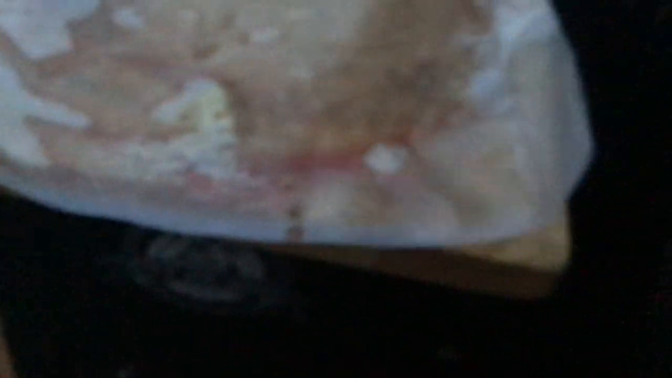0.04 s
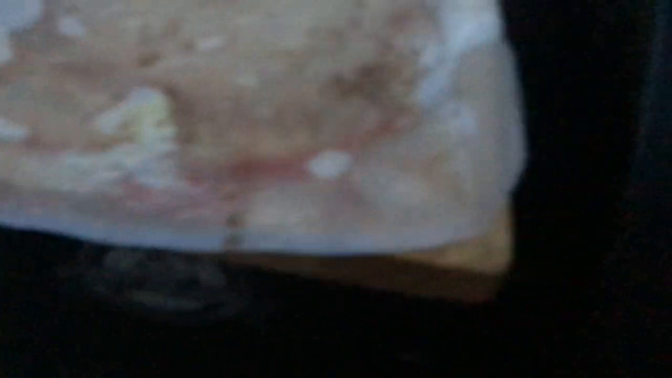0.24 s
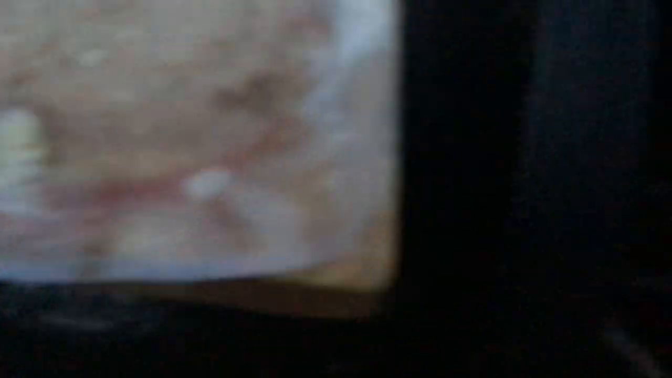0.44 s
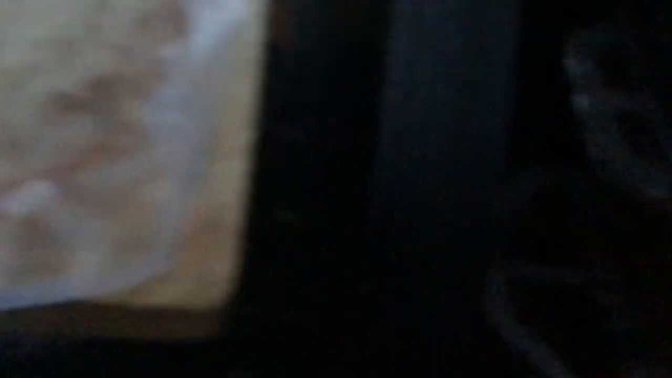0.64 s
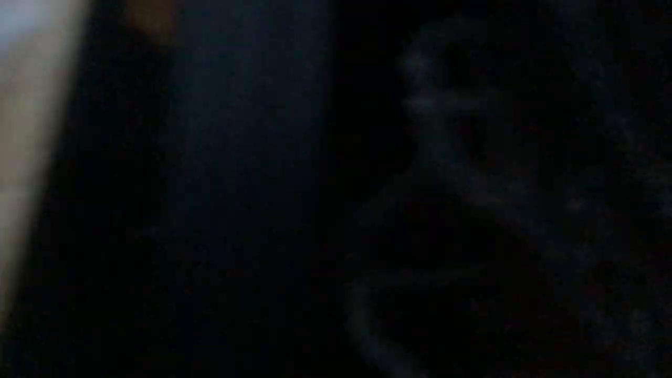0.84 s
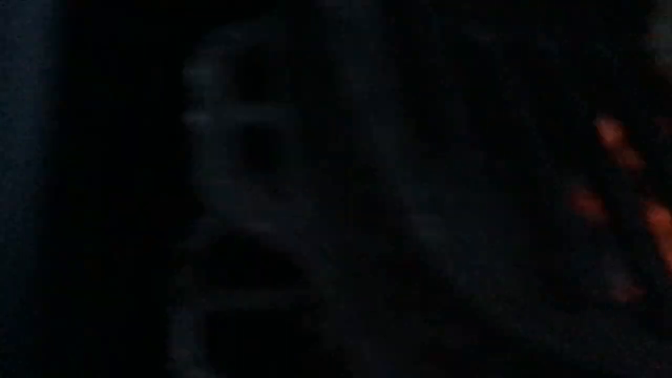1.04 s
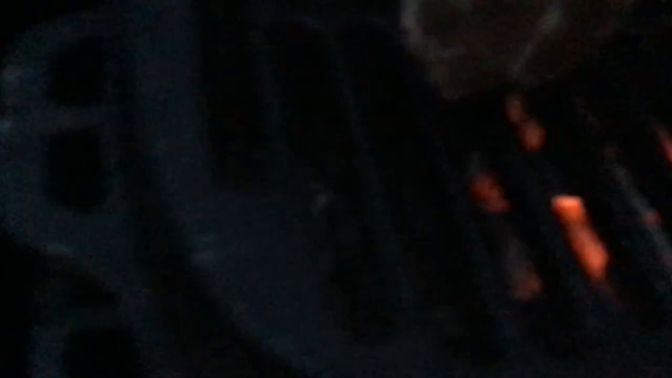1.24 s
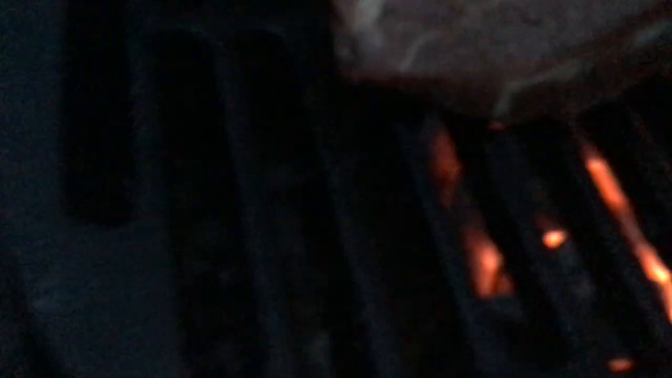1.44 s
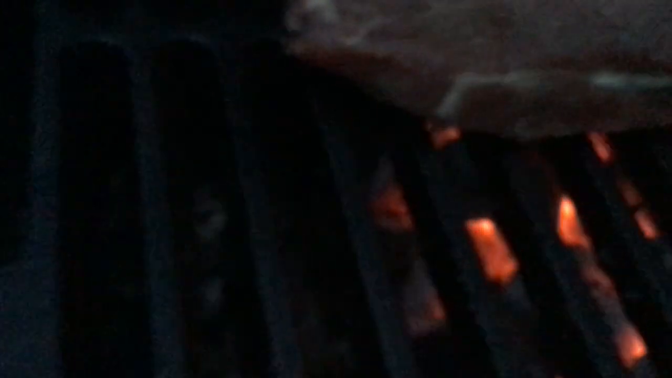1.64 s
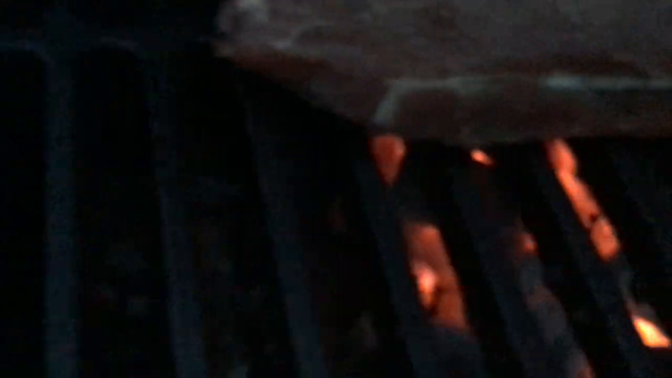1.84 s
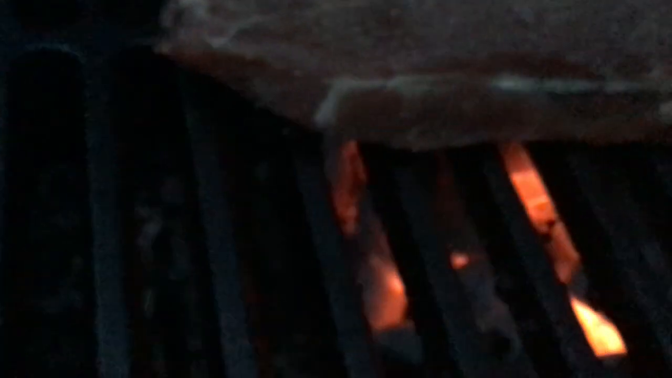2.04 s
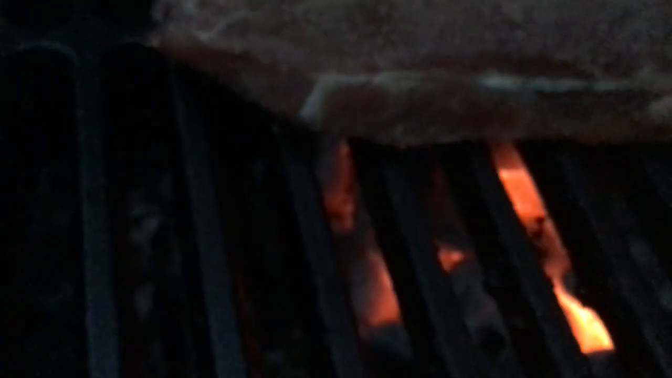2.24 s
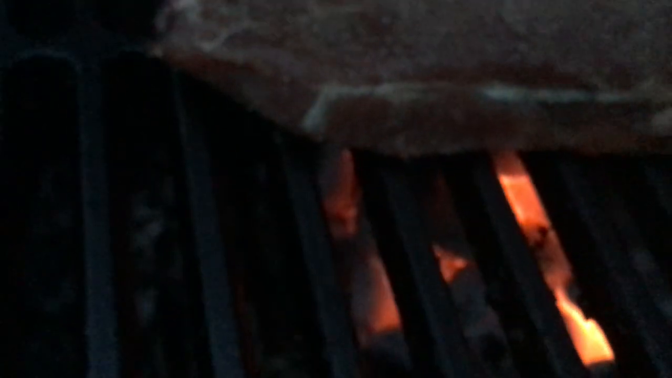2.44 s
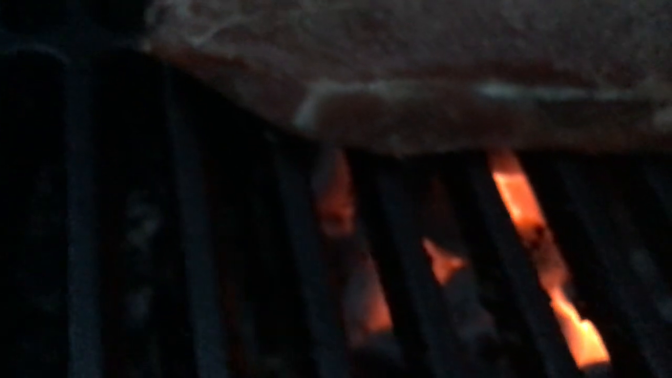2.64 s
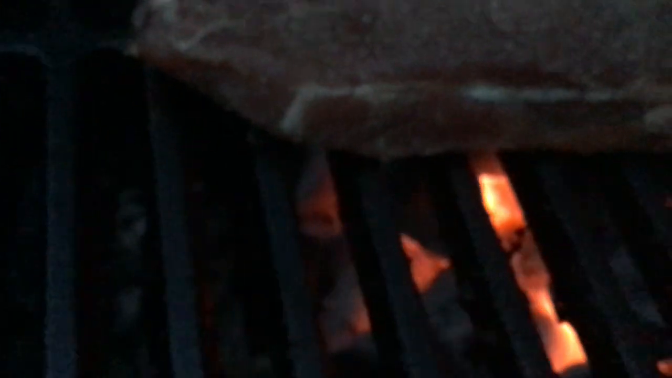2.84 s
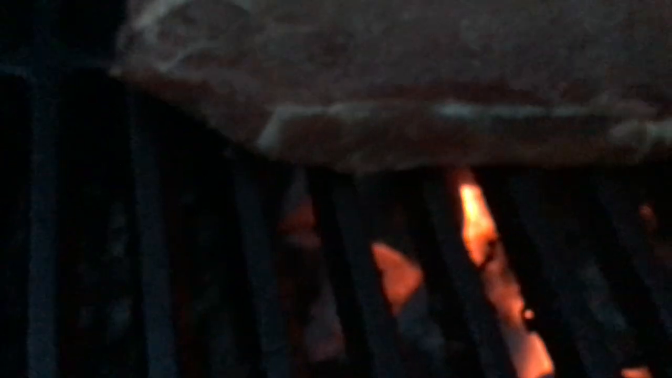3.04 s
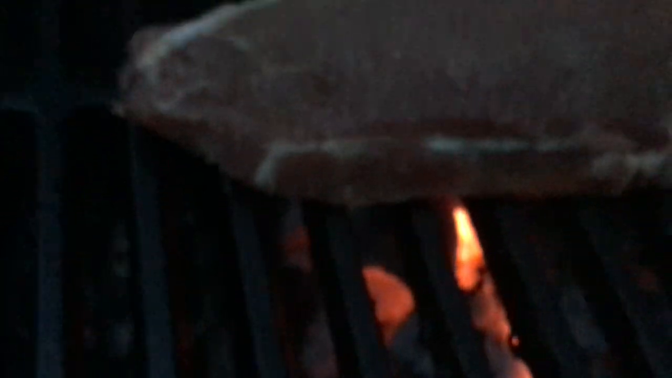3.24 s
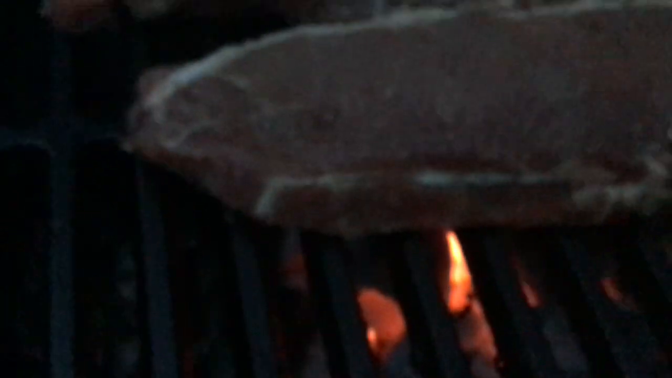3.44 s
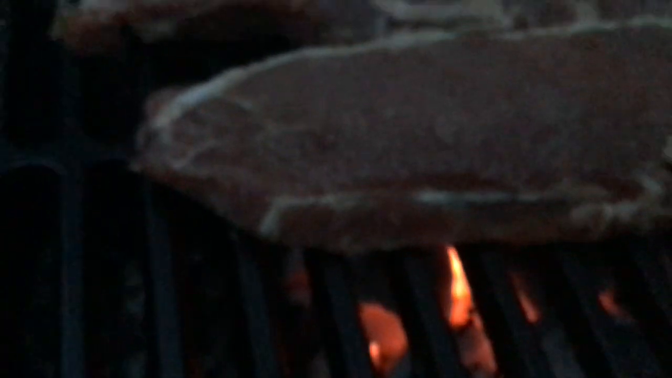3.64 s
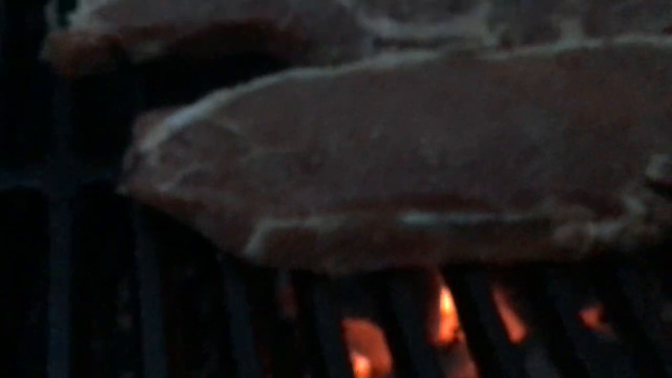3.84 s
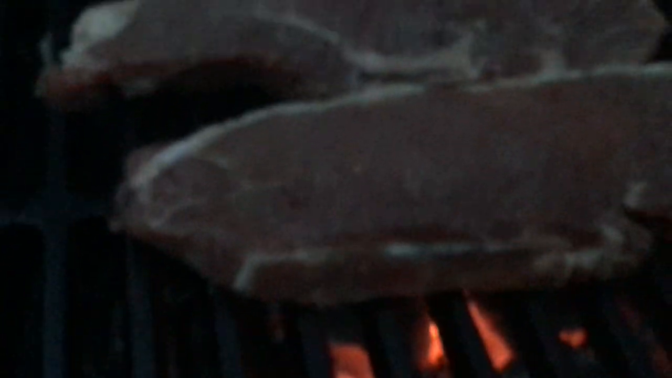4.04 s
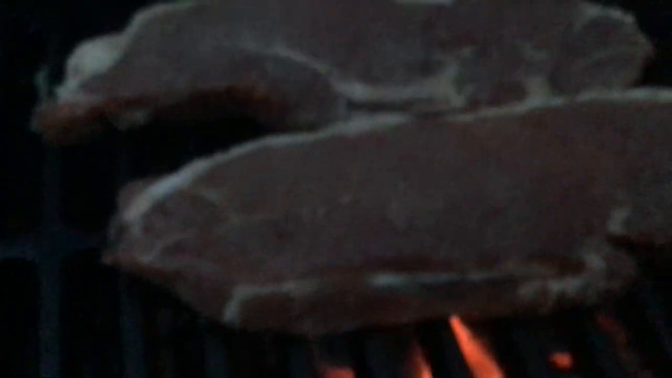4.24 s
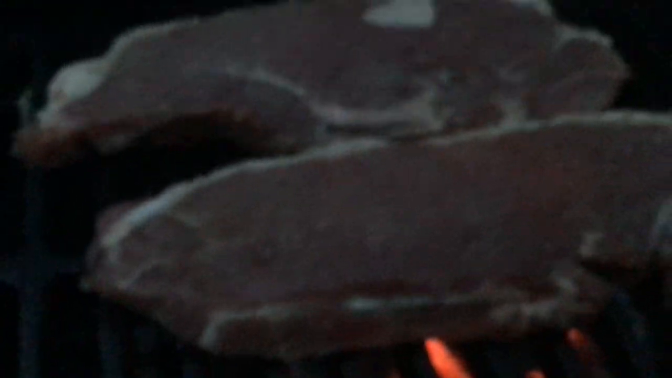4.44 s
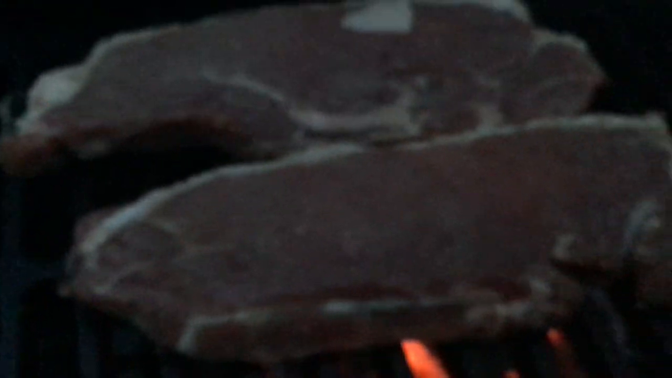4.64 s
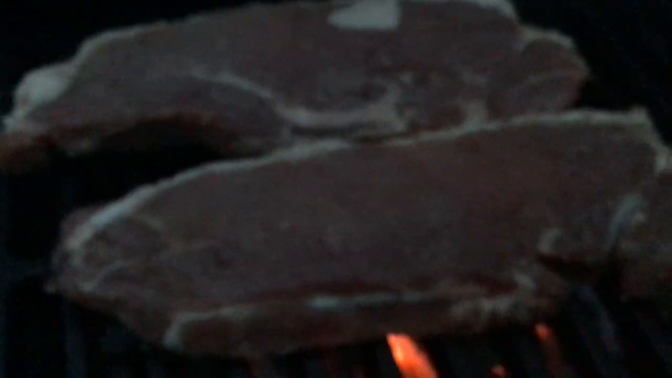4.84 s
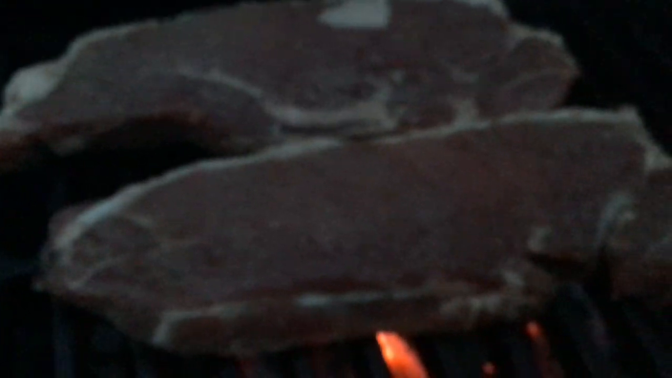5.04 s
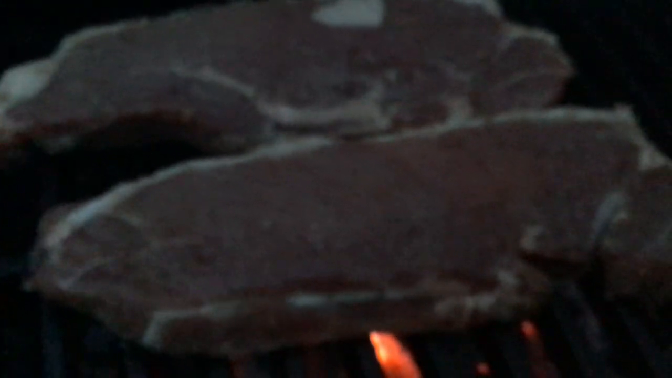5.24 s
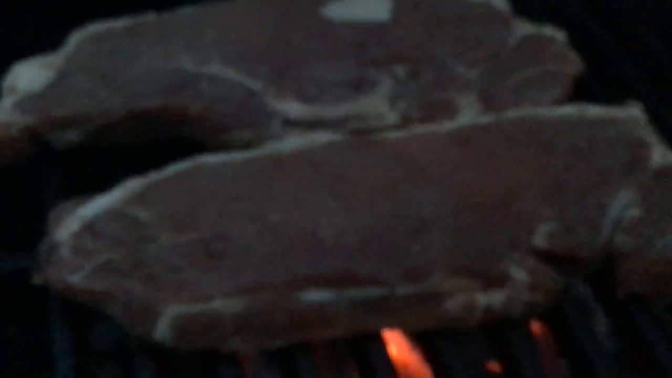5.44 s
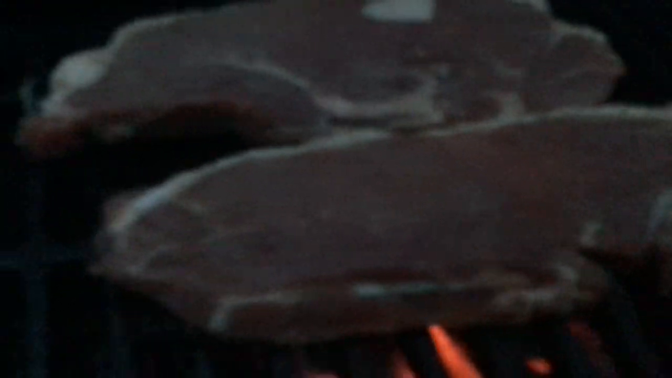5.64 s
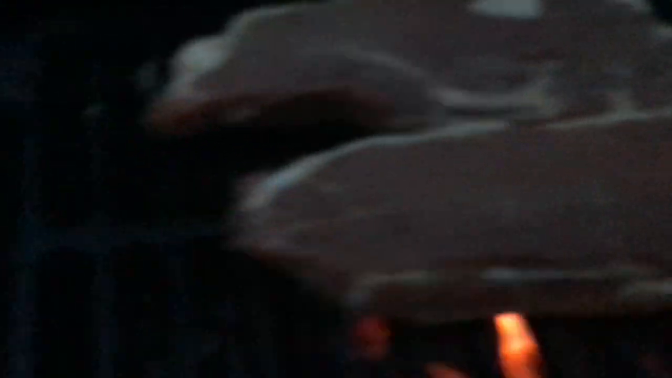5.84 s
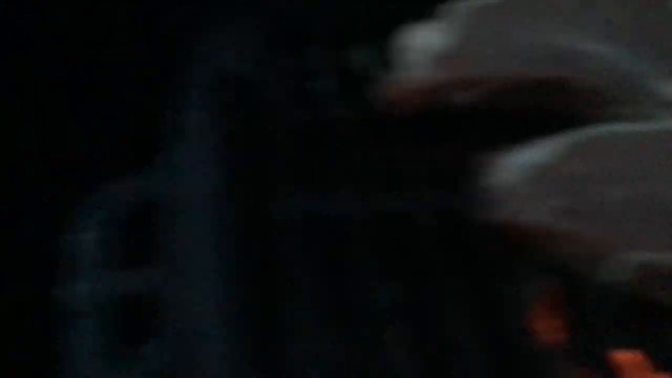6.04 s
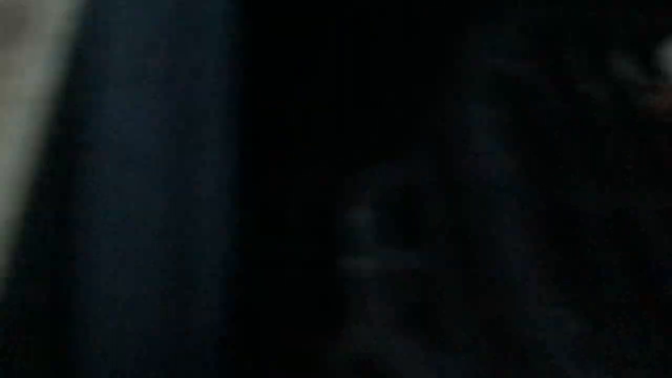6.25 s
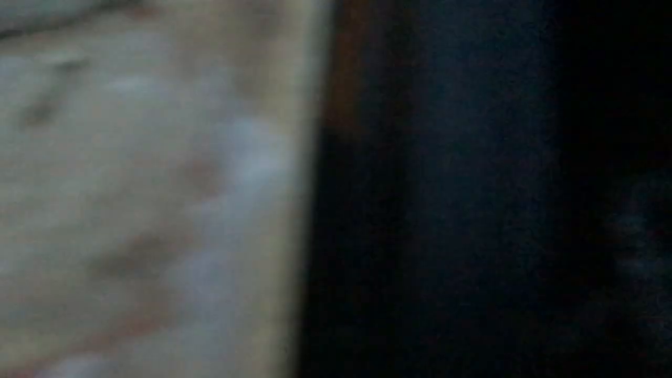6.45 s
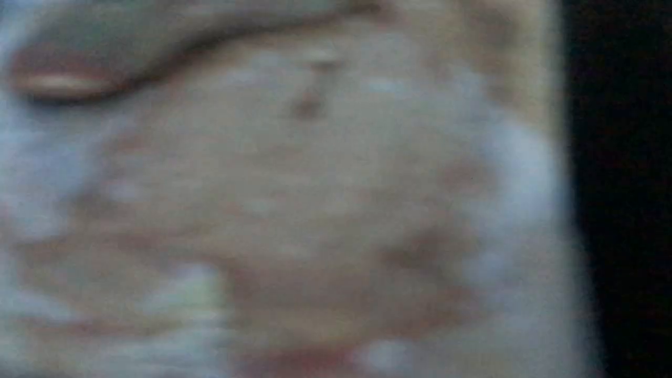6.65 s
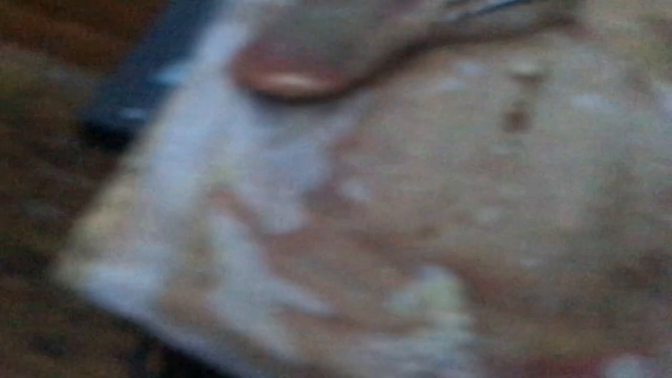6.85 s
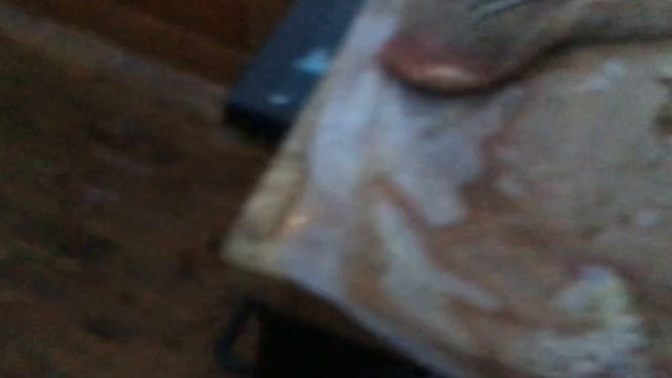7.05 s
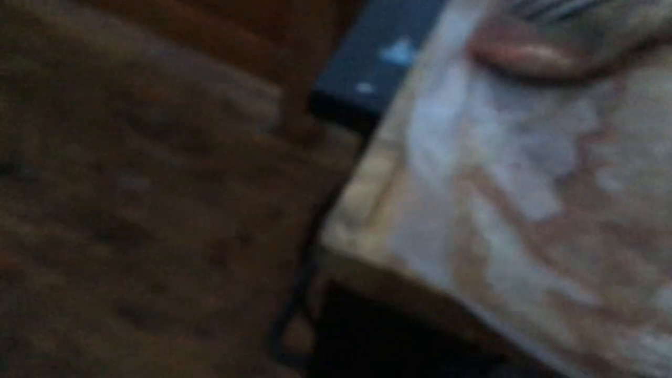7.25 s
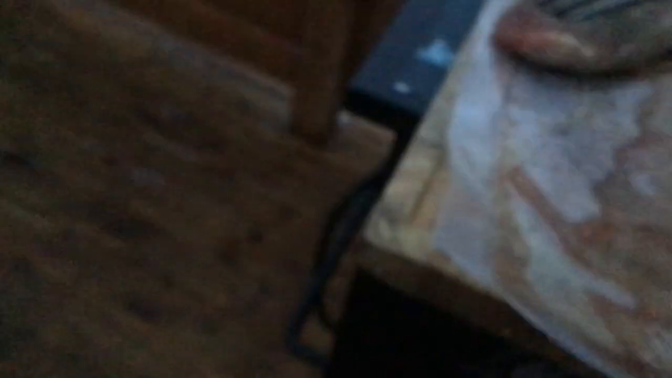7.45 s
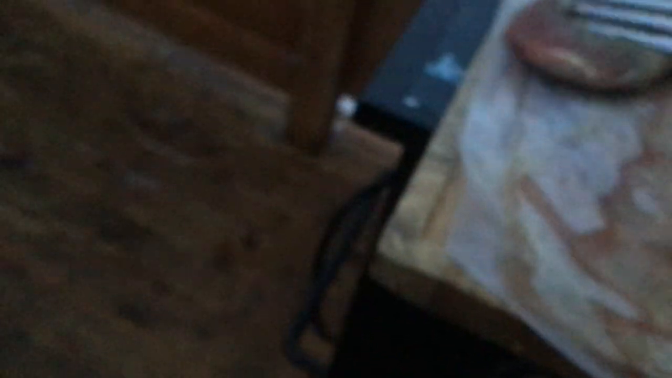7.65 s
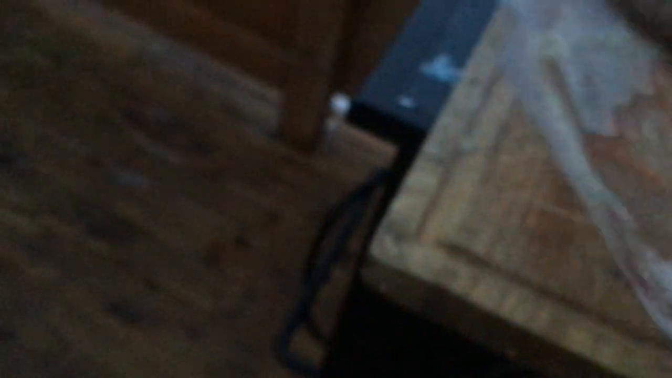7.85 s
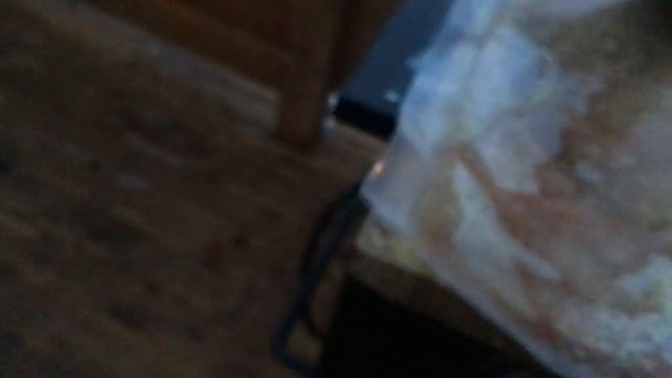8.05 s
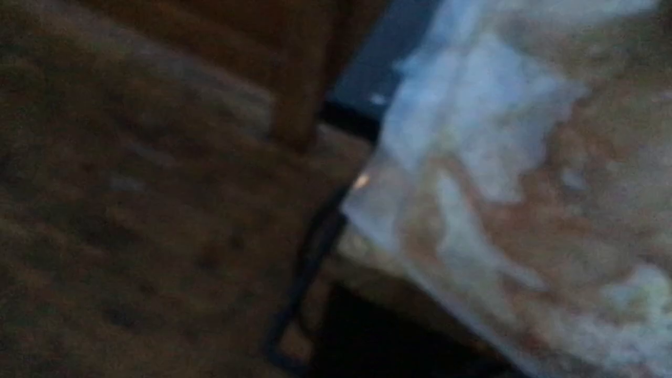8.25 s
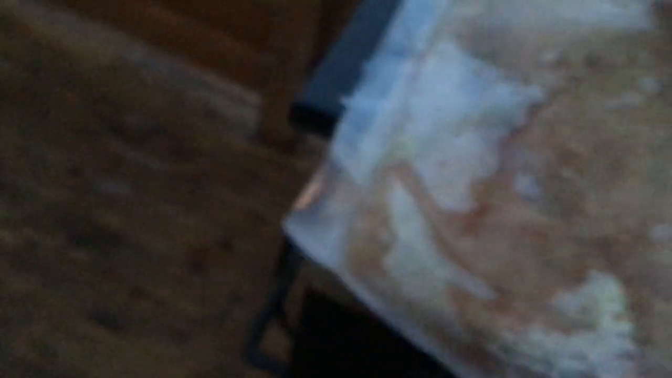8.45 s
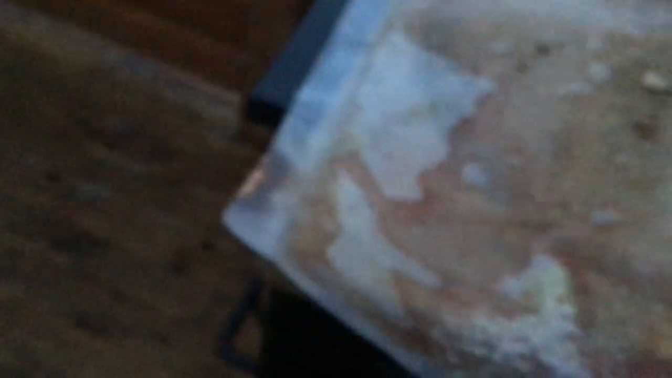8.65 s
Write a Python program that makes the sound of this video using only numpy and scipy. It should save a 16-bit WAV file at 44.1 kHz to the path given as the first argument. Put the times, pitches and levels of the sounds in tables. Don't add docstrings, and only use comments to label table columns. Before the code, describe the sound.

Outdoors beside a small charcoal grill, meat hisses softly over low distant traffic and a faint humming fan. The handheld microphone moves close above and the sizzle swells, bright and dense, with a few sharp fat cracks up to about four seconds. Dull handling bumps follow; the hiss recedes as the microphone turns away, and wrapping film snaps crisply at the end.

```python
import sys
import numpy as np
from scipy import signal
from scipy.fft import rfft, irfft, next_fast_len
from scipy.io import wavfile
from scipy.ndimage import uniform_filter1d

SR = 44100
rng = np.random.default_rng(int(sys.argv[2]) if len(sys.argv) > 2 else 0)


def decibels_to_gain(level_db):
    exponent = np.asarray(level_db, float) / 20
    return 10 ** exponent


def unload_wav(signal):
    wavfile.write(
        sys.argv[1],
        SR,
        np.round(np.clip(np.atleast_2d(signal).T, -1, 1) * 32767).astype(np.int16),
    )


N = 384111
EDGE_HZ = 15730


def evened(x):
    return x / np.sqrt(np.mean(x ** 2) + 1e-20)


def read(points, hz):
    f, value = np.transpose(points)
    return np.interp(np.log(hz + 1), np.log(f + 1), value)


def bump(hz, centre_hz, width_hz):
    return 1 / (1 + (2 * (hz - centre_hz) / width_hz) ** 2)


def add(mix, start_s, sound):
    part = mix[round(start_s * SR):][:len(sound)]
    part += sound[:len(part)]


def causal(gain_db):
    cepstrum = irfft(np.log(decibels_to_gain(np.maximum(gain_db, -100))))
    half = len(cepstrum) // 2
    cepstrum[1:half] *= 2
    cepstrum[half + 1:] = 0
    return irfft(np.exp(rfft(cepstrum)))


def drift(shape, bins, frames):
    field = uniform_filter1d(rng.standard_normal(shape[::-1]).T, max(round(bins), 1), 0)
    return evened(uniform_filter1d(field, max(round(frames), 1), 1))


def bursts(per_s, spread_db):
    when, size, sign = rng.random(N), rng.exponential(1, N), rng.choice([-1., 1.], N)
    return evened((when < per_s / SR) * sign * decibels_to_gain(spread_db * np.minimum(size, 4)))


def ringing_snap(hz, cycles, peak_db):
    t = np.arange(2400) / SR
    grit = rng.standard_normal(2400)
    turns = t * hz / cycles
    ring = np.sin(2 * np.pi * hz * t + .15 * grit) * turns * np.exp(-2.5 * turns)
    return decibels_to_gain(peak_db) * ring / abs(ring).max()


def yard():
    # hz, density_db
    traffic = [(35, -33), (60, 5), (119, -2.5), (146, -5.5), (186, -2), (569, -8), (617, -12), (678, -8),
               (949, -13.5), (1500, -20.5), (1950, -41), (3300, -120)]
    # hz, width_hz, level_db
    fan_tones = [
        (119.6, 14, -76),
        (187, 63, -77),
    ]
    # time_s, pitch_hz, level_db
    whine = [(0, 618, -80), (.7, 636, -78), (1.3, 602, -74.5), (2.2, 610, -80.5), (3.4, 612, -75.5),
             (4.3, 610, -73), (6.3, 605, -80.5), (7.0, 604, -74.5), (8.71, 610, -79.5)]
    traffic_db, swell_depth_db, waver_depth_db = -66, -1.5, 1.8
    hum_hz, hum_db, whine_clean_db = 118, -77.5, -2

    hz, t, z = signal.stft(rng.standard_normal(N), SR, nperseg=4096)
    wash = decibels_to_gain(read(traffic, np.maximum(hz, 65)))
    wash *= decibels_to_gain(traffic_db) / np.sqrt(np.mean(wash ** 2))
    time_s, *tracks = np.transpose(whine)
    whine_hz, whine_db = (np.interp(t, time_s, track) for track in tracks)
    waver_db, swell_db = drift((2, len(t)), bins=1, frames=12) * [[waver_depth_db], [swell_depth_db]]
    whine_db = whine_db + waver_db
    flutter_db = 0.96 * drift(z.shape, bins=8, frames=4)
    wash = wash[:, None] * decibels_to_gain(flutter_db + swell_db * bump(hz[:, None], 60, 380))

    for tone_hz, width_hz, db in fan_tones + [(whine_hz, 18, whine_db - 5.5)]:
        wander_hz = tone_hz * (1 + 0.0032 * drift((1, len(t)), bins=1, frames=15))
        line = bump(hz[:, None], wander_hz, width_hz)
        line = line * decibels_to_gain(0.69 * drift((1, len(t)), bins=1, frames=4))
        wash = np.hypot(wash, decibels_to_gain(db) * line * np.sqrt(2 * SR / (np.pi * width_hz)))
    fuzzy = signal.istft(z * wash, SR, nperseg=4096)[1][:N]

    now = np.arange(N) / SR
    jitter_hz = 12 * drift((1, N), bins=1, frames=1500)[0]
    whine_turns = np.cumsum(np.interp(now, t, whine_hz) + jitter_hz) / SR
    whine_gain = decibels_to_gain(np.interp(now, t, whine_db) + whine_clean_db)
    clean_whine = whine_gain * np.sqrt(2) * np.sin(2 * np.pi * whine_turns)
    hum_turns = np.cumsum(hum_hz + 0.301 * jitter_hz) / SR
    hum = decibels_to_gain(hum_db) * np.sqrt(2) * np.sin(2 * np.pi * hum_turns)
    return fuzzy + clean_whine + hum


def board_creak():
    out = np.zeros(N)
    add(out, 1.5, ringing_snap(hz=2320, cycles=38, peak_db=-60.5))
    return out


def film():
    # start_s, length_s, crackle_db
    rustles = [
        (7.66, 0.19, -68),
        (7.85, 0.12, -61),
        (7.936, 0.11, -57),
        (8.06, 0.52, -66),
    ]
    # start_s, peak_db, pitch_hz
    snaps = [(7.69, -50, 3200), (7.724, -54, 1750), (7.76, -49, 2800), (7.795, -58, 1750),
             (7.858, -52, 1600), (7.859, -48, 3020), (7.875, -32, 11400), (7.885, -38, 10500),
             (7.899, -38, 12000), (7.94, -55, 4006), (7.943, -43, 9490), (7.967, -42, 12500),
             (7.994, -40, 10200), (7.995, -49, 2700), (8.004, -49, 3100), (8.015, -46, 3000),
             (8.027, -43, 3320), (8.07, -46, 12000), (8.13, -48, 11000), (8.257, -41, 8290),
             (8.291, -40, 5500), (8.382, -36, 5270), (8.396, -37, 8040), (8.484, -45, 4810),
             (8.5605, -52, 1850), (8.3, -54, 2800), (8.5607, -37, 6300), (8.61, -40, 9390)]
    t = np.arange(N) / SR
    pull = np.zeros(N)
    for start_s, length_s, db in rustles:
        phase = np.clip((t - start_s) / length_s, 0, 1)
        pull += decibels_to_gain(db) * abs(np.sin(np.pi * phase))
    crackle = pull * bursts(per_s=560, spread_db=4)
    out = signal.lfilter(*signal.butter(2, [1500, 15000], "band", fs=SR), crackle)
    for start_s, peak_db, hz in snaps:
        cycles = 1.6 * (1 + (1500 / hz) ** 2)
        add(out, start_s, ringing_snap(hz, cycles, peak_db))
    return out


def knocks():
    # start_s, peak_db, felt_below_hz, felt_above_hz, softness
    blows = [(3.8722, -42, 80, 30, 3), (3.9597, -55, 150, 40, 2.9), (1.897, -59, 400, 150, 3.8),
             (5.811, -49.5, 328, 198, 5.4), (5.857, -59, 260, 170, 8.8), (6.2093, -46, 90, 48, 3.3),
             (7.823, -58.5, 430, 340, 8), (7.854, -56, 700, 450, 6), (7.885, -63, 250, 130, 6.3),
             (7.944, -64, 300, 170, 6.5), (8.015, -57, 350, 150, 4.6), (8.559, -61, 680, 540, 9.8)]
    out, hz = np.zeros(N), np.fft.rfftfreq(8192, 1 / SR) + 1
    for start_s, peak_db, top_hz, low_hz, softness in blows:
        top_loss_db = 10 * np.log10(1 + (hz / top_hz) ** softness)
        low_loss_db = 10 * np.log10(1 + (low_hz / hz) ** 8)
        push = causal(-top_loss_db - low_loss_db)[:4000]
        add(out, start_s, decibels_to_gain(peak_db + 5) * push / abs(push).max())
    return out


def pops():
    # start_s, peak_db, tail_db, tail_t60_s
    cracks = [
        (0.7964, -35, -22, 0.02),
        (1.667, -26.5, -20, 0.02),
        (1.8967, -11.5, -20, 0.024),
        (2.5813, -19, -16, 0.022),
        (2.8266, -19.5, -8, 0.02),
        (3.9599, -8, -19, 0.018),
    ]
    # hz, density_db
    crack_colour = [(300, -24), (1100, -27.5), (2500, -12), (4300, -17), (5200, -10.5), (6800, -6.5),
                    (8300, -7.5), (9800, -2.5), (12200, -7), (15000, -7), (16000, -10), (16900, -54)]
    crack = causal(read(crack_colour, np.fft.rfftfreq(1024, 1 / SR)))[:400]
    out, t = np.zeros(N), np.arange(1500) / SR
    for start_s, peak_db, tail_db, t60_s in cracks:
        taps = rng.standard_normal(1500) * (t > .0004) * decibels_to_gain(tail_db - 60 * t / t60_s)
        taps[0] = 1
        pop = np.convolve(taps, crack)
        add(out, start_s + .0009, decibels_to_gain(peak_db) * pop / abs(pop).max())
    return out


def sizzle():
    # time_s, level_db
    nearness = [(0, -54.5), (.5, -53), (1.0, -49.5), (1.72, -49.5), (1.82, -42.5), (2.0, -39),
                (2.62, -39.5), (2.72, -36), (3.3, -36.5), (3.6, -39), (3.92, -40), (4.2, -42.5), (5.4, -45),
                (6.1, -45), (6.6, -48), (7.05, -55), (7.8, -57), (8.71, -55.5)]
    # hz, density_db
    hiss = [
        [(1600, -20.5), (2600, -12.5), (3700, -4.5), (4600, -1), (5200, -0.5), (6500, -2.5), (7300, -6),
         (8300, -2), (9300, 3), (11000, -0.5), (12000, -6), (15000, -8)],
        [(500, -21.5), (1000, -20), (1600, -14.5), (2600, -12.5), (3700, -9.5), (4600, -2.5), (5200, 0.5),
         (6500, -4), (7300, -5.5), (8300, -3.5), (9300, 1), (11000, 3), (12000, -0.5), (15000, 1)],
        [(1600, -18.5), (2600, -8.5), (3700, -6), (4600, 1), (5200, 1), (6500, 0), (7300, -4.5), (8300, -1.5),
         (9300, -1.5), (11000, -3.5), (12000, -9), (15000, -10)],
    ]
    # hz, width_hz, lift_db
    hollows = [(472, 53, 14), (610, 27, 8), (820, 40, 2), (1260, 56, 9.5), (1720, 70, 2.5),
               (2170, 230, 3.5), (4175, 320, -2), (4700, 240, 0.5)]
    # start_s, lift_db, rise_s, fade_s, bubble_hz
    surges = [(1.28, 1, .12, 0.18, 13000), (1.74, 1, .05, .1, 4500), (2.02, 3, 0.069, .15, 5500),
              (2.08, 2.5, .1, .08, 13500), (2.36, 2, .05, .1, 11000), (2.46, 3, 0.076, 0.14, 5570),
              (2.66, 1.5, 0.055, 0.12, 14000), (2.74, 3, 0.13, .1, 5700), (2.85, 3, 0.088, .2, 9800),
              (3.15, 1.5, .05, .15, 12000), (3.68, 2.5, .08, 0.17, 13000), (4.9, 1.5, 0.068, .15, 5500),
              (4.98, 1.5, 0.074, 0.18, 13000), (5.85, 1, .15, 0.18, 12500), (6.5, 1, 0.19, .2, 4800)]
    # time_s, bearing (0 beside, 1 above, 2 away), reflection_hz, reflection_strength
    hand = [(0, .05, 3350, .8), (.8, 0.11, 3280, 0.81), (1.3, .4, 3130, 1.7), (1.72, 0.27, 2880, 1.7),
            (1.85, 0.69, 2850, 0.86), (2.9, 0.85, 2880, 0.45), (4.0, 1.16, 2640, 0.54),
            (5.2, 1.29, 2570, 0.78), (5.7, 1.28, 2650, 0.75), (6.1, 1.48, 3080, 0.48),
            (6.6, 1.48, 3350, 0.42), (7.0, 1.85, 3400, 0.63), (7.7, 2, 3350, .9), (8.0, 1.82, 3350, .1),
            (8.71, 1.9, 3370, 0.71)]
    # multiple_of_main, width_hz, lift_db
    reflections = [
        (.74, 180, 3.5),
        (1.01, 360, 4.5),
        (1.22, 350, -4),
    ]

    hz, t, z = signal.stft(bursts(per_s=14000, spread_db=2.5), SR, nperseg=1024, noverlap=896)
    column_hz = hz[:, None]
    time_s, *tracks = np.transpose(hand)
    bearing, main_hz, strength = (np.interp(t, time_s, track) for track in tracks)
    bearing = np.clip(bearing, 0, 2)
    shares = np.array([np.maximum(1 - abs(bearing - k), 0) for k in range(3)])
    above = shares[1]

    colour_db = np.transpose([read(spectrum, hz) for spectrum in hiss]) @ shares
    hollows_db = sum(db * bump(hz, f, width_hz) for f, width_hz, db in hollows)
    colour_db += hollows_db[:, None] * above
    colour_db -= 10 * np.log10(1 + (500 / (column_hz + 1)) ** 3)
    for multiple, width_hz, db in reflections:
        colour_db += strength * db * bump(column_hz, multiple * main_hz, width_hz)

    power = decibels_to_gain(2 * colour_db) / len(hz)
    found_db = 10 * np.log10(power[(hz > 4000) & (hz < 15500)].sum(0))
    colour_db += np.interp(t, *np.transpose(nearness)) - found_db

    for start_s, db, rise_s, fade_s, bubble_hz in surges:
        rising = (t - start_s) / rise_s
        fading = 1 + (start_s + rise_s - t) / fade_s
        flare = np.clip(np.minimum(rising, fading), 0, 1)
        colour_db += db * flare * (0.2 + bump(column_hz, bubble_hz, 0.62 * bubble_hz))

    combs_db = 1.6 * drift(z.shape, bins=2.4, frames=91.4)
    patches_db = 0.38 * drift(z.shape, bins=25, frames=17)
    spits_db = 0.38 * drift((1, len(t)), bins=1, frames=11) * (0.49 + 0.5 * above)
    z = z * decibels_to_gain(colour_db + combs_db + patches_db + spits_db)
    return signal.istft(z, SR, nperseg=1024, noverlap=896)[1][:N]


def scene():
    return np.tile(yard() + board_creak() + film() + knocks() + pops() + sizzle(), (2, 1))


def recorder_filters(x):
    size = next_fast_len(N + SR)
    hz = np.fft.rfftfreq(size, 1 / SR)
    lag = np.exp(-2j * np.pi * 1.89 * np.log(hz + 39))
    rumble_cut = signal.sosfilt(signal.butter(6, 58, "high", fs=SR, output="sos"), x)
    heard = rfft(rumble_cut, size) * lag
    mid = irfft(heard * (hz < EDGE_HZ), size)[:N]
    top = irfft(heard * ((hz >= EDGE_HZ) & (hz < 16750)), size)[:N]
    loud = 200. * (abs(mid) > .24)
    gate = uniform_filter1d(uniform_filter1d(loud, 200), 200)
    return mid + .3 * top * np.minimum(gate, 1)


def side_flecks(mid):
    # centre_s, from_hz
    flecks = [(.321, 7600), (.932, 11000), (1.187, 5200), (1.584, 11000), (1.858, 5200), (1.858, 6400),
              (1.858, 9000), (1.858, 12400), (1.858, 14400), (2.413, 5700), (2.487, 10300), (2.487, 14500),
              (2.747, 5700), (2.747, 12400), (2.814, 4300), (2.814, 5200), (3.597, 4700), (3.597, 5700),
              (3.925, 6900), (4.255, 5700), (4.255, 9600), (4.487, 8300), (4.946, 7900), (4.946, 10600),
              (5.177, 4300), (5.177, 6300), (6.04, 10300), (7.149, 4800), (7.64, 10300)]
    side, hz = np.zeros(N), np.fft.rfftfreq(2048, 1 / SR)
    window = signal.windows.kaiser_bessel_derived(2048, 4 * np.pi) ** 2
    for centre_s, low_hz in flecks:
        band = (hz > low_hz) & (hz < min(low_hz + 1350, EDGE_HZ - 100))
        start = round(centre_s * SR) - 1024
        heard = irfft(rfft(mid[start:start + 2048]) * band)
        noise = evened(irfft(rfft(rng.standard_normal(2048)) * band))
        add(side, start / SR, decibels_to_gain(-2.3) * np.std(heard) * window * noise)
    return side


def band_limit(x):
    return signal.sosfilt(signal.butter(12, 16860, fs=SR, output="sos"), x)


def record(dry):
    mid = recorder_filters(dry[0])
    side = side_flecks(mid)
    return band_limit(np.array([mid + side, mid - side]))


dry = scene()
out = record(dry)
unload_wav(out)
```